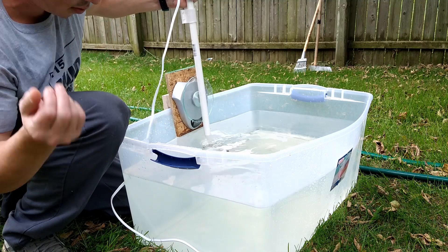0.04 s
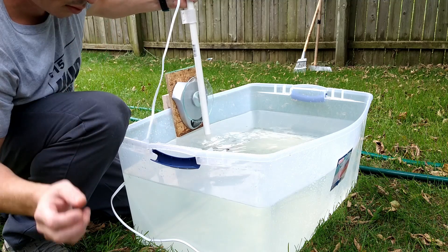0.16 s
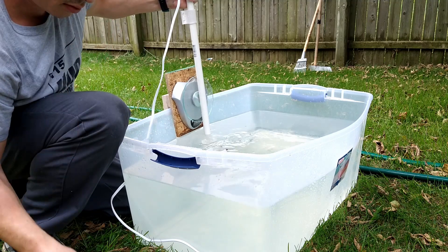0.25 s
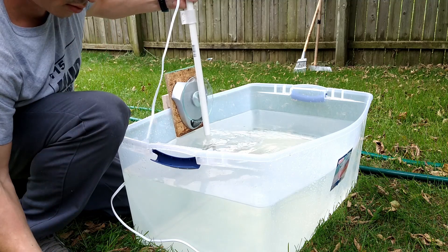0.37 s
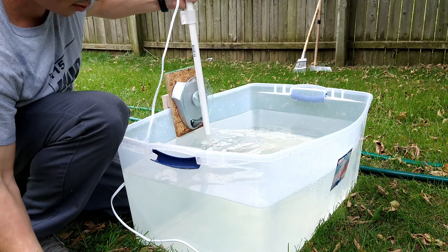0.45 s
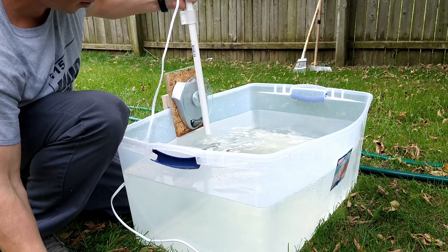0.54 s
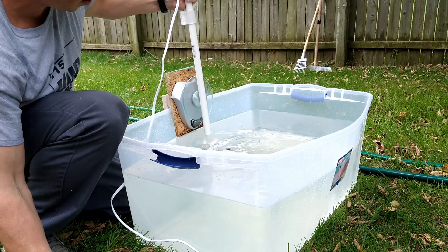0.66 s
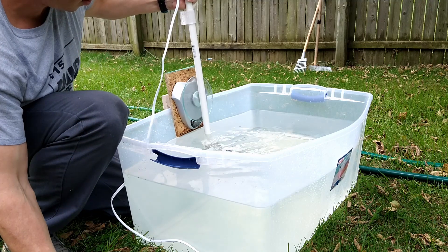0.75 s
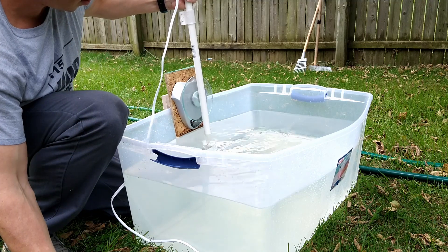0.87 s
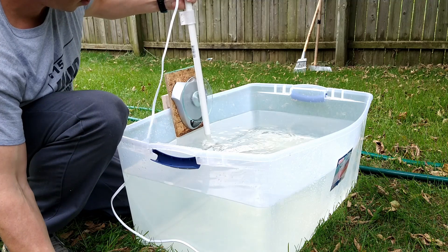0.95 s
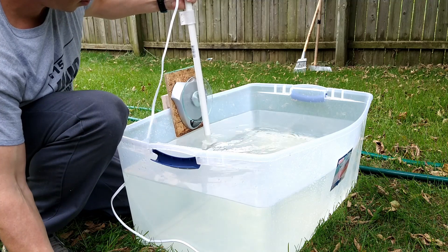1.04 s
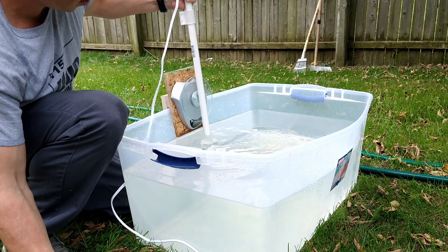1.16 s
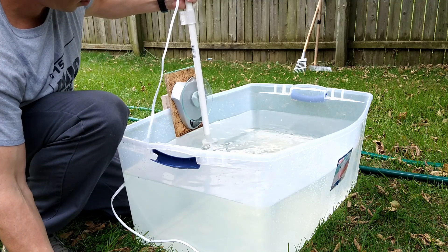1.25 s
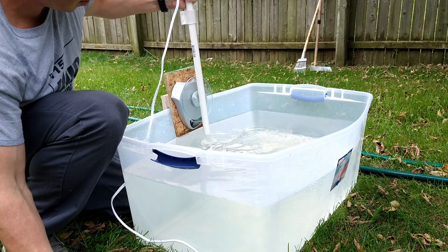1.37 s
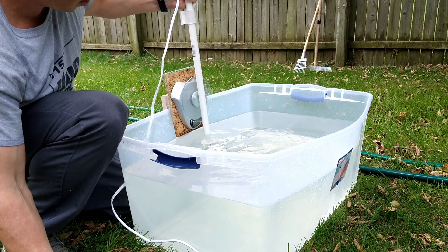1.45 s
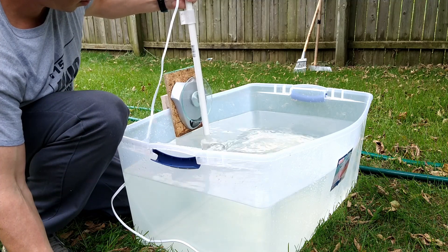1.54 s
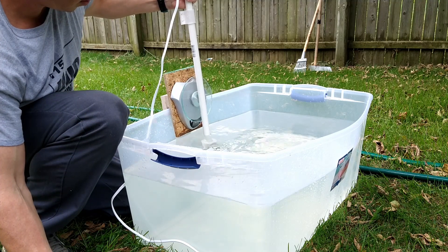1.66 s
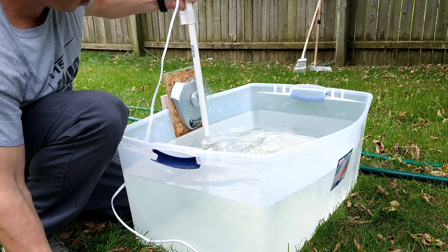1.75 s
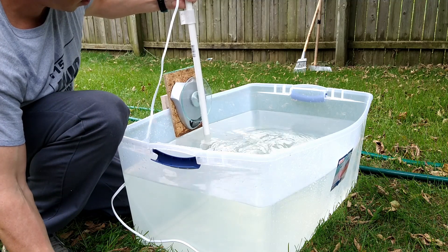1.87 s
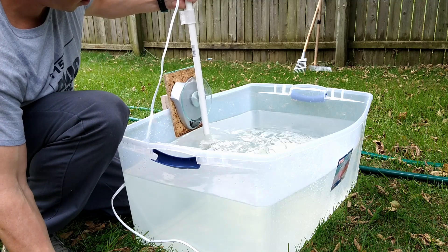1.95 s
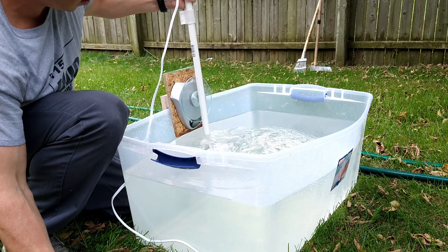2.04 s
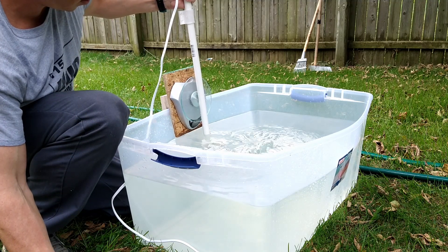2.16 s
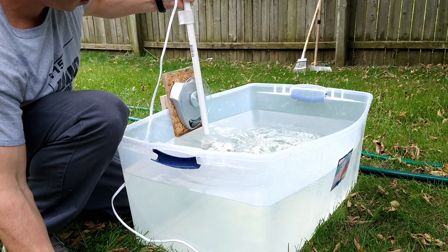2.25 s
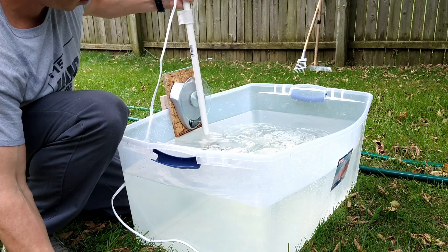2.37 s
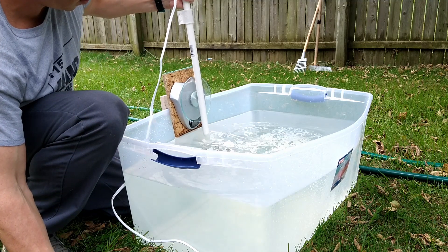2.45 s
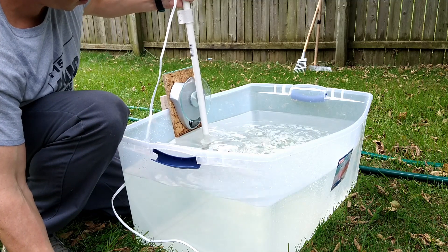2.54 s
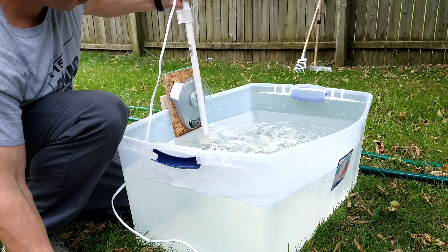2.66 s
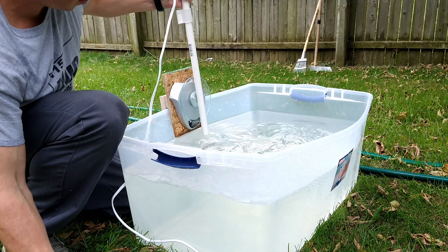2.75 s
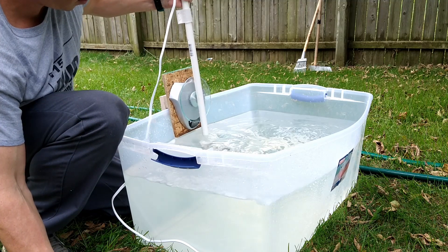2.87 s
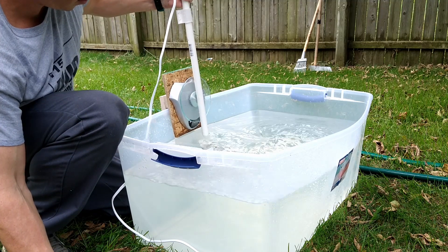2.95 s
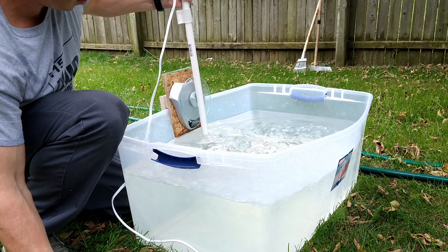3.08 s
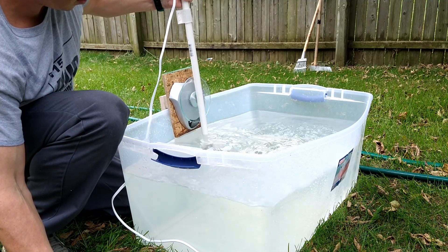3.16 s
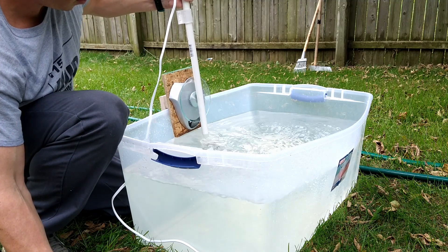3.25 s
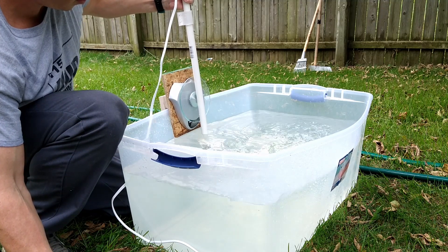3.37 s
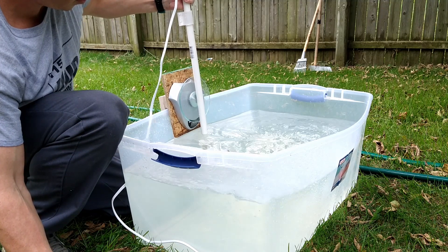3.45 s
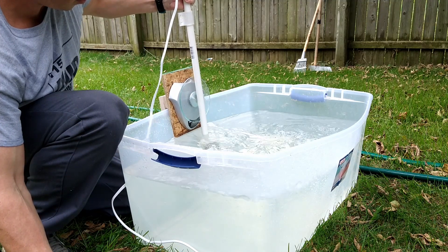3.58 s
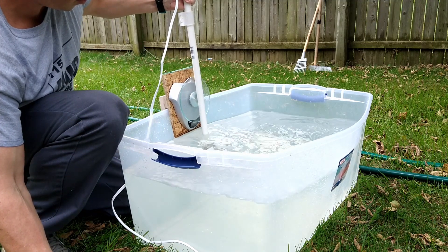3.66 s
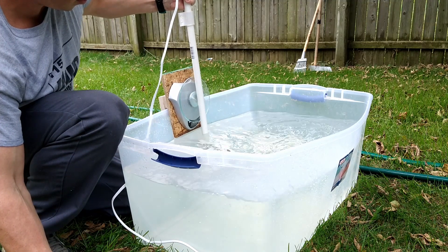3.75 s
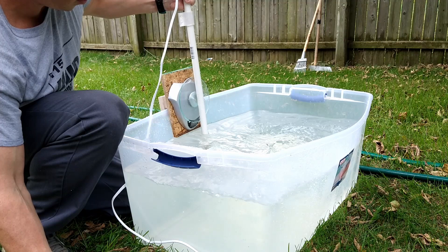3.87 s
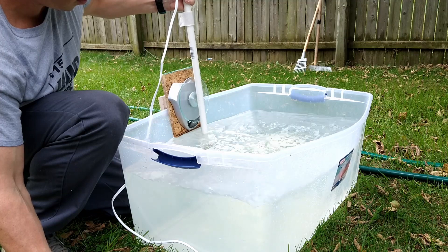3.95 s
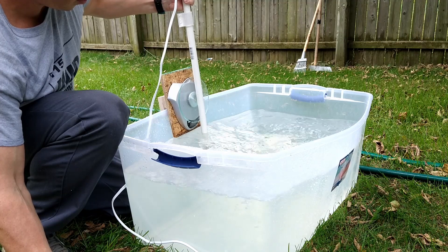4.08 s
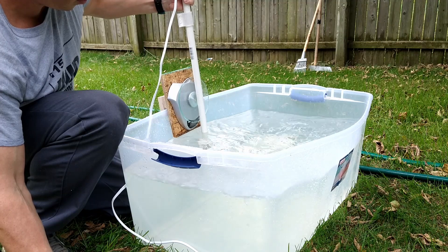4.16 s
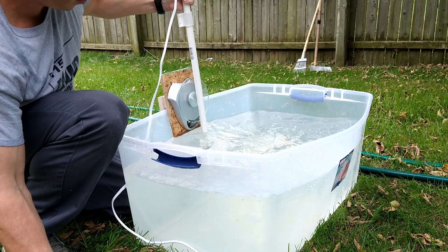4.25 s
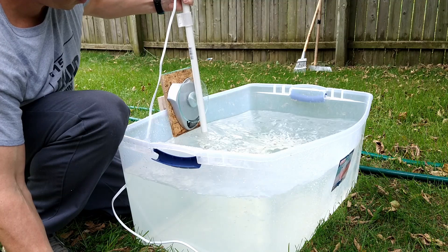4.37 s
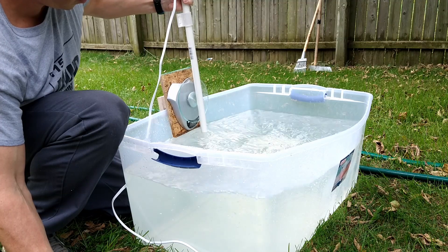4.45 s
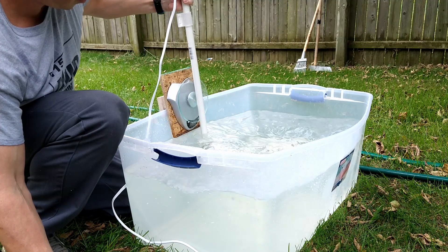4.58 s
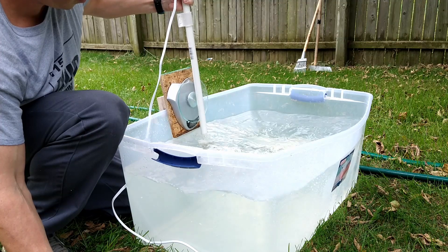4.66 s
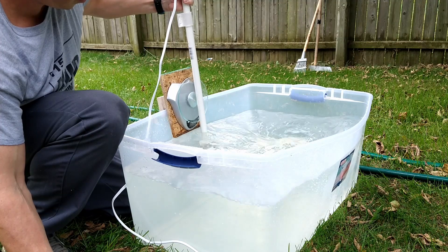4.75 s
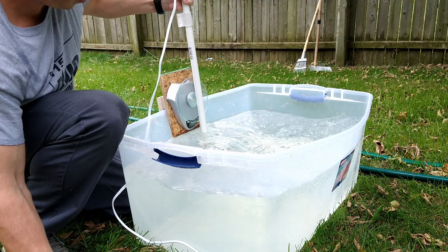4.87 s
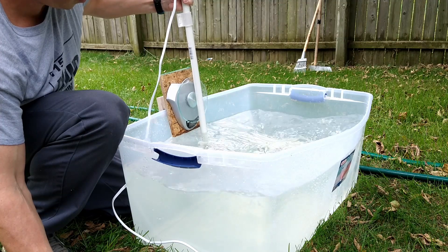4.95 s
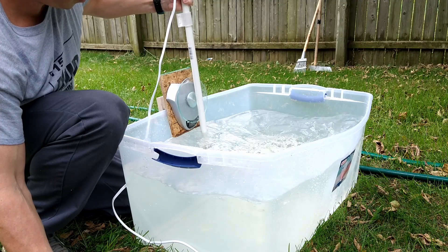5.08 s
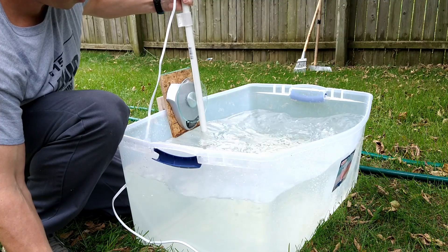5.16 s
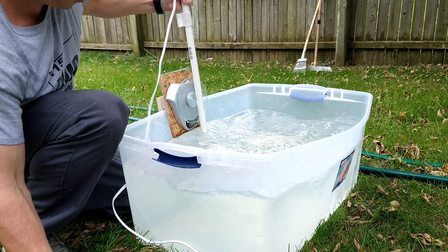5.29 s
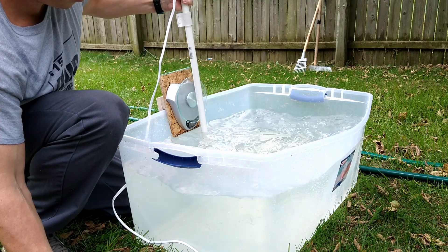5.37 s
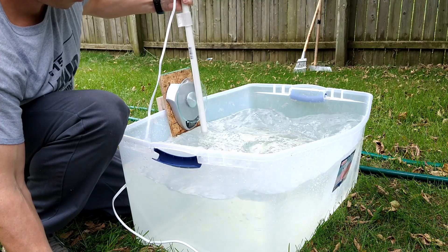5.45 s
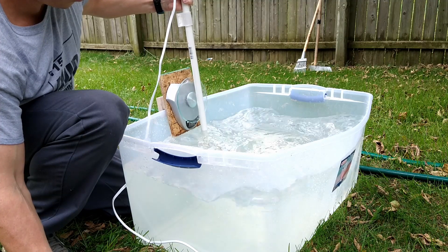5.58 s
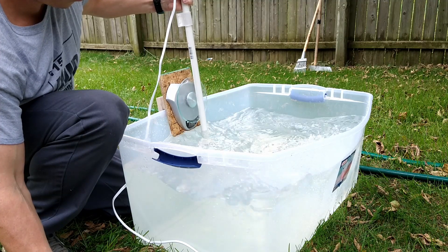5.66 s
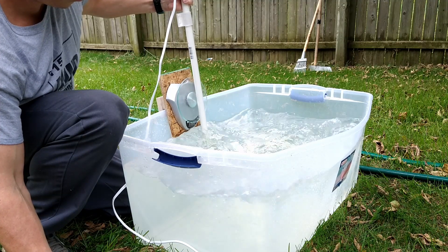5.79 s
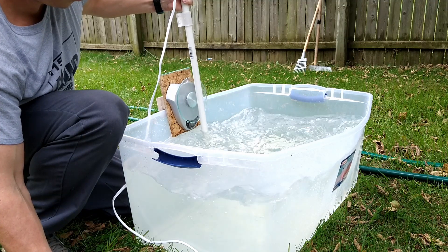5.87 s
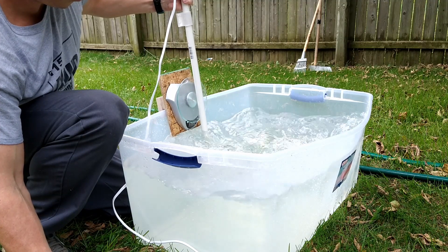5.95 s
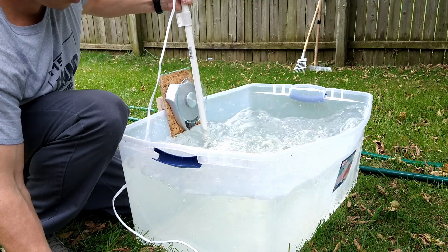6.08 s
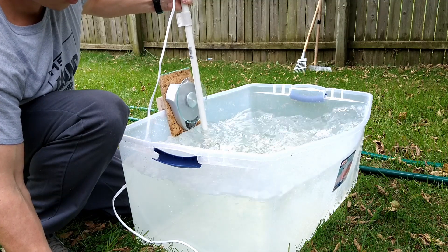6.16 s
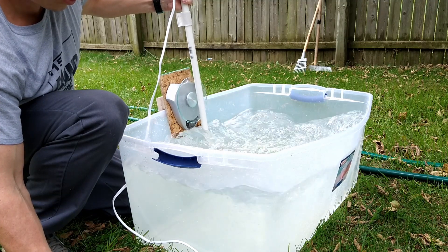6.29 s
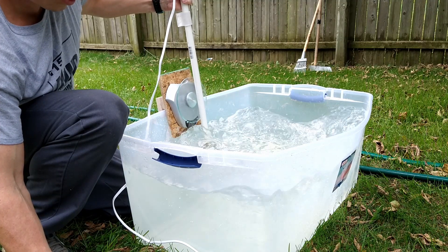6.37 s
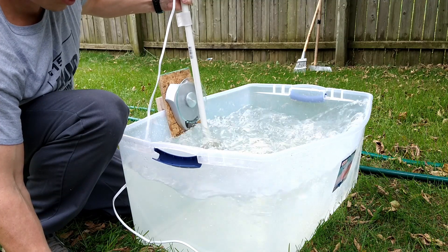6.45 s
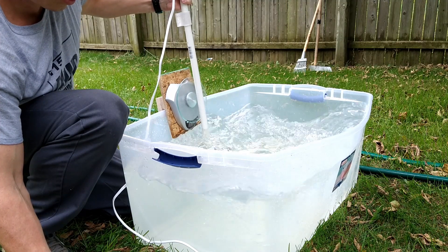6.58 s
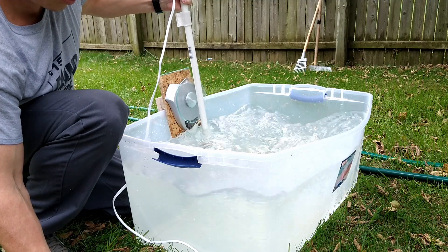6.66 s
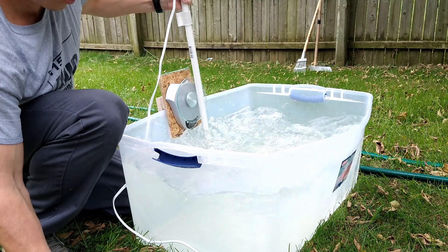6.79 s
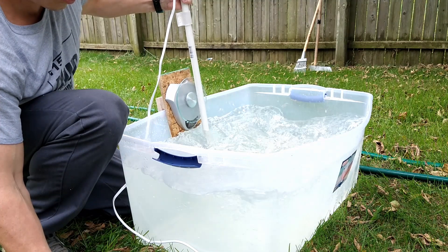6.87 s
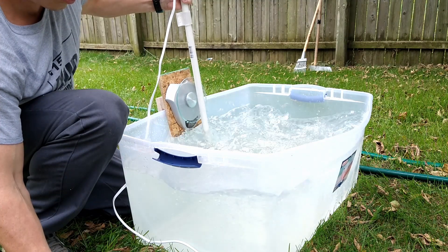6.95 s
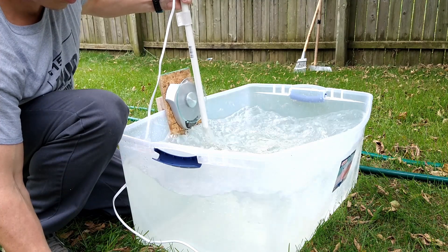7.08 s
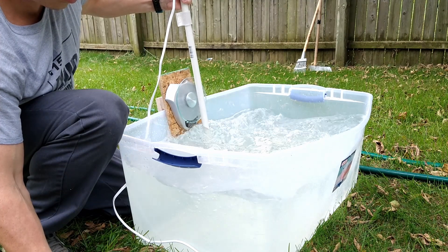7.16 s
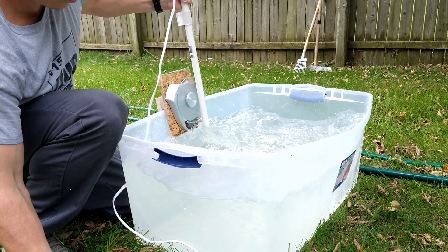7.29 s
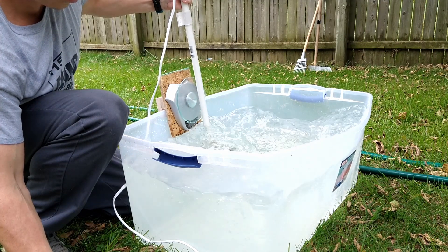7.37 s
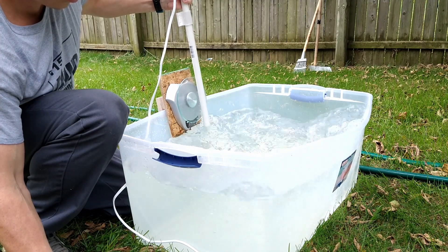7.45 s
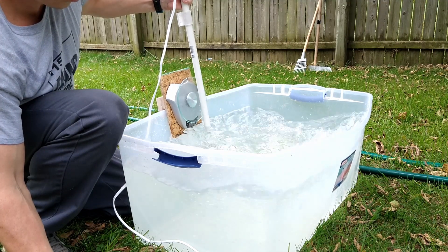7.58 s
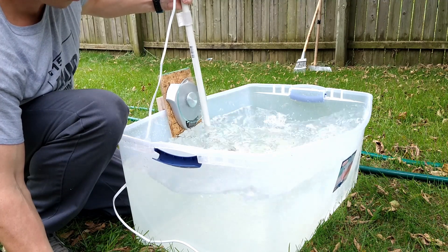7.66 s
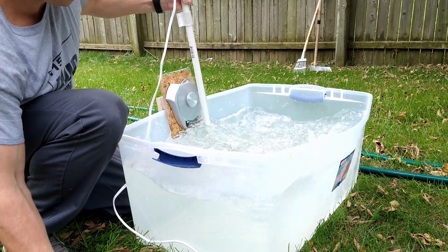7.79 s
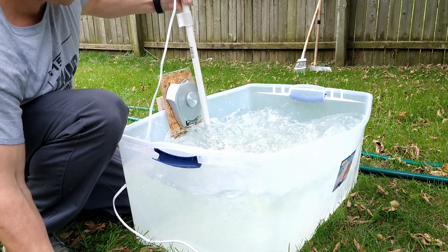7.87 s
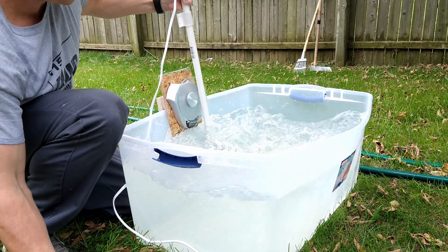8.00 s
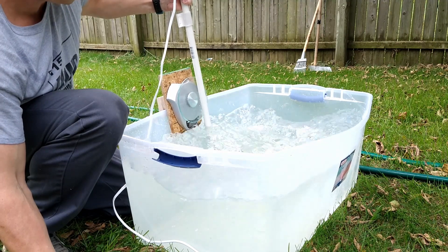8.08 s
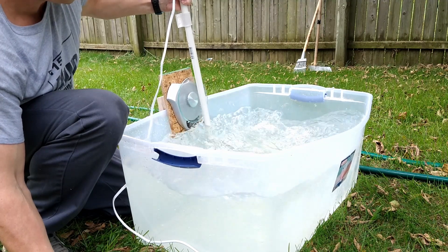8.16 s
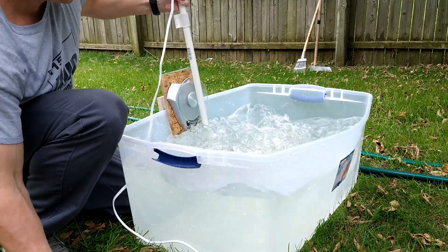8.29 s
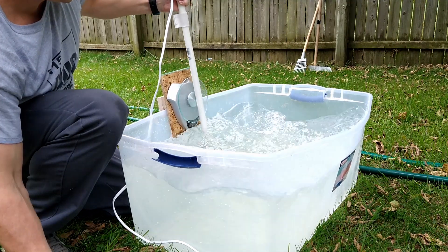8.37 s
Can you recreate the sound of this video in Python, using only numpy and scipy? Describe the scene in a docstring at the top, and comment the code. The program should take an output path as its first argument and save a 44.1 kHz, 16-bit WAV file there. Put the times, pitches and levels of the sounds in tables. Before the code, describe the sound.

Close outdoor take of a geared motor whirring from near silence to a shrill whine while water splashes, gurgles and plops in a plastic tub.

```python
"""A small electric motor on a pipe speeds up and slows again, driving a propeller in a tub of water on a lawn.
The whine is a gliding gear tone with faint shaft tones; the whir is noise hissing and ringing in the housing.
The water is frothy noise, blurred blade tones, many small bubbles and single plops; drops snap as noise cracks.
Behind it are a low noise rumble, partly from the tub and propeller, a low hum, faint hiss and thin high tones.
Two close microphone ports hear the motor and tub from one side."""
import sys
import numpy as np
from scipy import signal
from scipy.fft import rfft, irfft, next_fast_len
from scipy.io import wavfile
from scipy.ndimage import uniform_filter1d, map_coordinates

SR = 44100
rng = np.random.default_rng(int(sys.argv[2]) if len(sys.argv) > 2 else 0)


def to_wav(sig):
    """Store sig (one row per channel, or 1-D mono) as 16-bit WAV at the path in sys.argv[1].

    Samples outside -1..1 are clipped; the rate is SR.
    """
    pcm = np.clip(np.atleast_2d(sig), -1, 1) * 32767
    pcm = np.round(pcm).astype(np.int16)
    wavfile.write(sys.argv[1], SR, pcm.T)  # frames by channels


N = 371674  # length of the scene in samples


def amp(db):
    """Turn decibels into a plain gain."""
    return 10 ** (np.asarray(db) / 20)


def unit(x):
    """Scale a sound to an overall rms of 1."""
    return x / np.sqrt(np.mean(x ** 2) + 1e-20)


def along(points, hz):
    """Read a curve of (Hz, value) points on a log frequency axis."""
    f, value = np.transpose(points)
    return np.interp(np.log(hz + 1), np.log(f + 1), value)


def curves(rows):
    """One value per sample for each column after the time."""
    s, *columns = np.transpose(rows)
    t = np.arange(N) / SR
    return [np.interp(t, s, column) for column in columns]


def wobble(rate):
    """A smooth random curve with `rate` random knots a second."""
    knots = rng.standard_normal(int(N * rate / SR) + 4)
    return map_coordinates(knots, [np.arange(N) * rate / SR])


def filtered(x, response):
    """Filter x by multiplying its spectrum with a response of frequency."""
    m = next_fast_len(N + SR // 2)  # spare room for the filter to ring out
    spectrum = rfft(x, m) * response(np.fft.rfftfreq(m, 1 / SR))
    return irfft(spectrum, m)[..., :N]


def resonances(modes):
    """Sum resonances, each a (Hz, width Hz, dB) row, with alternating signs into one response."""
    def mode(f, center, width, db):
        return amp(db) * 1j * f * width / (center * center - f * f + 1j * f * width)

    return lambda f: sum((-1) ** k * mode(f, *row) for k, row in enumerate(modes))


def rush(gain, alike, patchy_db):
    """Stereo noise of rms 1 with random louder and softer patches in time and pitch."""
    z = signal.stft(rng.standard_normal((2, N)), nperseg=512)[2]
    field = rng.standard_normal(z.shape[1:])
    field = uniform_filter1d(field, size=6, axis=0)  # smooth over pitch
    field = uniform_filter1d(field, size=10, axis=1)  # smooth over time
    pair = signal.istft(z * amp(patchy_db * unit(field)), nperseg=512)[1][:, :N]

    def mid_side(hz):
        # this angle sets how alike the two channels are
        turn = np.arccos(np.clip(along(alike, hz), -1, 1)) / 2
        return gain(hz) * np.array([np.cos(turn), np.sin(turn)])

    mid, side = filtered(pair, mid_side)
    return unit(np.array([mid + side, mid - side]))


# How far the left port leads the right. Each row: frequency in Hz, phase lead in radians.
LEFT_LEAD = [(0, 0), (950, 0), (1460, .8), (2760, 1.4), (3270, 2.1), (5080, 2.7), (5860, 2.5), (8790, 3.7),
             (9730, 5.4), (10900, 6.1), (11400, 10.7), (12000, 10.7), (14200, 12.6), (16600, 13.1)]
# Loudness across the ports. Each row: frequency in Hz, left minus right in dB.
LEFT_BALANCE = [(60, -2), (110, 13), (200, -1), (380, 1), (700, 1), (1290, 0), (2380, 0.5), (4400, 5.5),
                (8120, 3.5), (15000, 2)]


def ports(pair):
    """Sound reaches the left port first and, at most pitches, louder; each port takes half the difference."""
    side = np.array([[.5], [-.5]])
    f, lead = np.transpose(LEFT_LEAD)

    def response(hz):
        return amp(side * along(LEFT_BALANCE, hz)) * np.exp(1j * side * np.interp(hz, f, lead))

    return filtered(pair, response)


# How fast gear teeth meet, idling low until the control is turned up in steps.
# Each row: time in seconds, gear mesh frequency in Hz.
GEAR_SPEED = [(0, 700), (.9, 775), (1.3, 1082), (1.8, 1545), (1.95, 1597), (2.2, 1602), (2.8, 1844),
              (3.43, 2106), (3.7, 2125), (4.04, 2375), (4.33, 2405), (4.66, 2566), (5.38, 2995),
              (5.65, 3104), (5.88, 3177), (6.15, 3178), (6.35, 3189), (6.5, 3183), (6.66, 3187),
              (6.82, 3178), (7.14, 3194), (7.3, 3136), (7.54, 3032), (7.78, 2830), (7.99, 2564),
              (8.2, 2325), (8.43, 2308)]
INERTIA_S = .08  # the rotor rounds off every change of speed over this many seconds


def mesh_hz():
    """Gear mesh frequency at every sample, smoothed by the rotor's inertia."""
    return uniform_filter1d(curves(GEAR_SPEED)[0], size=round(INERTIA_S * SR), mode="nearest")


def by_speed(rows):
    """One value per sample for each column after the mesh frequency."""
    f, *columns = np.transpose(rows)
    hz = mesh_hz()
    return [np.interp(hz, f, column) for column in columns]


# How loud the gear tone arrives at each pitch, before flutter and echoes.
# Each row: mesh frequency in Hz, left level in dB, right level in dB.
WHINE_LEVELS = [(905, -94, -92), (1120, -72, -73), (1300, -77, -78), (1500, -66, -64), (1670, -58, -62),
                (1780, -65, -67), (1950, -57, -61), (2130, -45, -69), (2170, -44.5, -50), (2240, -46, -46),
                (2330, -37, -44), (2388, -39, -41.5), (2462, -37.5, -37.5), (2520, -38, -40.5),
                (2609, -32.5, -41), (2680, -32, -31.5), (2790, -25, -25.5), (2920, -22.5, -24),
                (3095, -24, -21.5), (3103, -32, -26.5), (3155, -19.5, -26.5), (3155, -26, -27.5),
                (3176, -36, -33.5), (3184.6, -25.5, -29), (3205, -20.5, -22)]
# Thin tones tied to the shafts. Each row: multiple of the mesh frequency, level in dB before the load gain.
SHAFT_ORDERS = [(.9, -54), (1.1, -50), (1.385, -52), (1.735, -56), (2.075, -48), (2.42, -56)]
ECHO_DB, ECHO_T60_S = -12, .35  # fence and house walls: gain in dB, seconds to fade by 60 dB


def whine():
    """The gear teeth make a slightly unsteady tone, with wall echoes and faint shaft tones."""
    hz = mesh_hz()
    lead, = by_speed(LEFT_LEAD)
    phase = 2 * np.pi * np.cumsum(hz + 3 * wobble(40)) / SR
    flutter = amp(1.7 * np.array([wobble(28), wobble(28)]))
    two_sides = np.sin(phase + np.array([lead, -lead]) / 2)
    tone = np.sqrt(2) * two_sides * amp(by_speed(WHINE_LEVELS)) * flutter

    t = np.arange(SR // 4) / SR
    tail = rng.standard_normal((2, len(t))) * amp(-60 * t / ECHO_T60_S)
    tail = tail / np.linalg.norm(tail[0])
    echoes = signal.fftconvolve(tone, tail, axes=1)[:, :N]
    tone = tone + amp(ECHO_DB) * echoes  # they beat with the tone while it glides

    orders = 0
    for multiple, db in SHAFT_ORDERS:
        orders = orders + amp(db + 3 * wobble(6.5)) * np.sin(multiple * phase + .6 * wobble(30))
    load = amp(3) * (hz / 3180) ** 8  # shaft tones grow steeply with speed
    return tone + ports(np.array([orders, orders]) * load)


# Color of the brush and bearing hiss. Each row: frequency in Hz, relative level in dB per Hz.
HISS_COLOR = [(530, -28.5), (900, -17.5), (2430, -8.5), (2770, -12), (3010, -6), (3120, -18), (3240, -10.5),
              (3360, -5), (3780, -9), (6640, -1.5), (7390, -7), (9730, -12.5), (15700, -17.5)]
# Housing resonances. Each row: frequency in Hz, width in Hz, relative level in dB.
HOUSING_MODES = [(3490, 130, -14), (4844, 420, -2.5), (5700, 480, -5), (6820, 415, 4), (10130, 2200, -10),
                 (12900, 2500, -12.5), (15500, 910, -14)]
# Mounting resonances. Each row: frequency in Hz, width in Hz, relative level in dB.
MOUNT_MODES = [(1100, 43, -9.5), (2855, 284, 0)]
# How alike left and right are. Each row: frequency in Hz, likeness from -1 to 1.
LIKENESS = [(300, 0.65), (1000, 0.52), (1600, 0.62), (3000, 0.25), (6800, 0.7), (10000, 0.4), (15000, 0.66)]
# Whir at each speed. Each row: mesh frequency in Hz, level shared by hiss and ring in dB,
# housing ring over hiss in dB.
WHIR_LEVELS = [(700, -75.5, 2), (810, -71.5, 0), (1015, -63, -1), (1150, -58, 3), (1365, -55, 0.5),
               (1610, -45.5, 9), (1844, -41.5, 9), (2070, -39, 3), (2444, -35.5, 0.5), (2820, -33.5, -4),
               (3166, -31.5, -7.5)]
LOAD_DB = 1.5  # lower hiss and mounting over the upper hiss


def whir():
    """Brushes and bearings make noise that hisses and rings in the housing and mounting."""
    level_db, ring_db = by_speed(WHIR_LEVELS)
    hiss = rush(lambda hz: amp(along(HISS_COLOR, hz)), LIKENESS, patchy_db=1.6)
    low_hiss = filtered(hiss, lambda hz: 1 / (1 + (hz / 3600) ** 6))
    high_hiss = hiss - low_hiss
    ring = rush(resonances(HOUSING_MODES), LIKENESS, patchy_db=2.0)
    mount = amp(-6.5) * rush(resonances(MOUNT_MODES), LIKENESS, patchy_db=1.5)
    share = 1 / np.sqrt(1 + amp(2 * ring_db))  # hiss and ring split one total power
    gain = amp(level_db + 0.16 * wobble(12)) * share
    return ports(gain * (high_hiss + amp(LOAD_DB) * (low_hiss + mount) + amp(ring_db) * ring))


# Low propeller tones, each loudest at its own speed.
# Each row: multiple of the mesh frequency, relative level in dB, mesh frequency in Hz where it is loudest.
BLADE_ORDERS = [(0.0682, -6, 2750), (0.2074, -5, 2690), (.2768, -5.5, 1790), (.346, -6, 2100)]
# What the tub lets out. Each row: frequency in Hz, gain in dB.
TUB_GAIN = [(100, -25), (210, -6.5), (400, -14.5), (500, -2.5), (570, -6), (650, 4), (730, 3), (830, 0.5),
            (920, -12), (1200, -5)]
BLADE_RANGE_HZ, BLADE_FADE_DB = 447, 7.5  # how far from that speed a tone fades, and by how much at most


def blades():
    """The turning blades make tones blurred by turbulence, heard through the tub walls."""
    mesh = mesh_hz()
    phase = 2 * np.pi * np.cumsum(mesh) / SR

    def blur():
        return wobble(85) * amp(2 * wobble(4))

    hum = 0
    for multiple, db, loudest_hz in BLADE_ORDERS:
        nearness = np.exp(-((mesh - loudest_hz) / BLADE_RANGE_HZ) ** 2)
        gain = amp(db - BLADE_FADE_DB * (1 - nearness))
        hum = hum + gain * (blur() * np.sin(multiple * phase) + blur() * np.cos(multiple * phase))
    return filtered(hum, lambda hz: amp(along(TUB_GAIN, hz)))


def bubbles(s, db, hz, t60, rise):
    """Damped sines with a soft start whose pitch climbs as the bubble nears the surface."""
    t = np.arange(SR // 16) / SR  # each bubble is cut off after 1/16 s
    life = t / t60[:, None]
    turns = hz[:, None] * t * (1 + rise * life)
    fade = amp(db[:, None] - 60 * life)
    soft = 1 - np.exp(-hz[:, None] * t)
    rows = fade * soft * np.sin(2 * np.pi * turns)
    at = np.round(s * SR).astype(int)[:, None] + np.arange(len(t))
    return np.bincount(at.ravel(), rows.ravel(), N + SR)[:N]  # add each bubble at its start


# The wash builds up behind the speed. Each row: time in seconds, churn level in dB, blade hum gain over churn in dB.
CHURN_LEVELS = [(.9, -75, -4), (1.6, -68.5, 9), (2.6, -66, 2.5), (3.1, -54, -1.5), (3.55, -53, -4),
                (4.65, -46.5, 2), (5.4, -44.5, -1), (6.2, -42, -2), (7.3, -40.5, -2), (7.7, -40.5, -7),
                (8.1, -44.5, -5.5), (8.43, -42.5, -6)]
# Color of the froth. Each row: frequency in Hz, relative level in dB per Hz.
FROTH_COLOR = [(88, -45), (150, -14), (205, -16.5), (312, -7), (450, -9), (640, 2), (718, -0.5), (816, 2),
               (985, -9.5), (1130, 2), (1300, -1.5), (1650, 1.5), (2400, -8), (3120, -14), (5280, -120)]
# Waves that break into froth. Each row: time of the peak in seconds, rise in dB, length in seconds.
WAVE_SURGES = [(3.202, 7.5, 0.015), (3.297, 6, 0.025), (4.413, 3, 0.037), (5.216, 3, .04),
               (5.516, 4.5, .02), (5.622, 6, 0.046), (5.74, 4.5, 0.032), (6.154, 3, 0.047),
               (6.33, 5.5, 0.059), (6.428, 5, .04), (6.542, 3.5, 0.014), (6.654, 3.5, 0.025),
               (6.774, 2.5, .05), (7.054, 2.5, .04), (7.164, 5.5, 0.026), (7.368, 4.5, 0.024),
               (7.491, 5.5, .03), (7.605, 2.5, 0.033), (7.83, 4, .03), (7.946, 4, 0.059)]
# Single big bubbles. Each row: start in seconds, level in dB before the soft start, starting pitch in Hz,
# seconds to fade by 60 dB (held to 0.1 at most when played).
BIG_BUBBLES = [(2.925, -42, 795, 0.055), (3.056, -28.5, 1425, 0.03), (3.194, -32.5, 680, 0.051),
               (4.558, -30, 1850, 0.08), (5.399, -42, 640, 0.063), (5.594, -29, 698, 0.079),
               (5.629, -32, 640, 0.078), (5.66, -39, 320, .09), (6.14, -43, 350, 0.094),
               (6.39, -34, 280, .09), (6.159, -36, 634, 0.045), (6.399, -35, 627, 0.06),
               (6.579, -36.5, 295, 0.11), (6.739, -30, 690, 0.045), (6.849, -31, 620, 0.067),
               (7.051, -25.5, 778, 0.051), (7.069, -38, 320, 0.096), (7.089, -43, 1160, 0.056),
               (7.429, -34, 309, 0.13), (7.482, -29, 599, 0.054), (7.581, -31.5, 426, 0.092),
               (7.799, -35.5, 622, 0.1), (8.269, -32, 760, 0.044)]


def water():
    """The propeller wash: a frothy rush in surges, blade hum, a swarm of small bubbles, and single plops."""
    level_db, hum_db = curves(CHURN_LEVELS)
    t = np.arange(N) / SR
    surge_db = 0.58 * wobble(14)
    for s, db, length in WAVE_SURGES:
        surge_db = surge_db + db * np.exp(-((t - s) / length) ** 2)
    froth = rush(lambda hz: amp(along(FROTH_COLOR, hz)), LIKENESS, patchy_db=1.0)

    count = 2500  # small bubbles at random times
    start = rng.random(count) * N / SR
    hz = np.clip(830 * np.exp(.3 * rng.standard_normal(count)), 430, 4000)
    size_db = np.minimum(-3.5 * np.log(1 - rng.random(count)), 12)  # many soft, few loud
    swarm = unit(bubbles(start, size_db, hz, np.minimum(17.8 / hz, .06), rise=0.29))

    s, db, pitch_hz, t60 = np.transpose(BIG_BUBBLES)
    plops = bubbles(s, db, pitch_hz, np.clip(t60, .01, .1), rise=0.166)
    churn = amp(surge_db) * (amp(-2.5) * froth + amp(-7.5) * swarm)
    wash = churn + amp(hum_db) * blades()
    return ports(amp(level_db) * wash + plops)


# Drops that snap on the tub wall and the water.
# Each row: start in seconds, level in dB before shaping, ring pitch in Hz, extra crack level in dB.
DROP_SNAPS = [(0.7394, -52, 4600, -2), (0.8987, -66, 5640, -2), (2.885, -22, 2800, -7.5),
              (2.902, -33, 6900, -5), (2.989, -26.5, 2740, -4), (3.056, -19.5, 2810, -5),
              (3.1284, -30.5, 2580, 4), (3.176, -23, 2370, -7), (3.1932, -20.5, 2590, -11),
              (3.226, -27, 2500, -0.5), (3.28, -28.5, 2580, -1), (3.3554, -25.5, 2700, -6),
              (6.5416, -16, 3120, -7), (6.767, -18, 3300, 0.5)]


def snaps():
    """Each drop is a short crack of noise with a brief ring."""
    out, t = np.zeros(N + SR), np.arange(SR // 40) / SR
    soft = 1 - np.exp(-t / .0004)
    crack_fade, ring_fade = amp(-60 * t / 0.022), amp(-60 * t / 0.02)
    for s, db, hz, crack_db in DROP_SNAPS:
        crack = amp(crack_db) * crack_fade * rng.standard_normal(len(t))
        ring = .5 * ring_fade * np.sin(2 * np.pi * hz * t)
        out[round(s * SR):][:len(t)] += amp(db) * soft * (crack + ring)
    # thin out the bass below 1100 Hz and soften the treble above 13000 Hz
    wet = filtered(out[:N], lambda hz: 1j * hz / (1100 + 1j * hz) / (1 + 1j * hz / 13000) ** 2)
    return ports(np.array([wet, wet]))


# Low rumble, partly from the tub and propeller, swelling as the wash builds.
# Each row: time in seconds, drone level in dB, deep rumble level in dB.
RUMBLE_LEVELS = [(0.0, -70, -69), (0.21, -67, -66), (0.44, -67, -71), (2.58, -65, -72.5), (2.79, -64, -68),
                 (3.45, -58.5, -65.5), (4.98, -58, -67), (8.19, -61, -61), (8.43, -62, -62)]
# Color of the low rumble. Each row: frequency in Hz, relative level in dB per Hz.
RUMBLE_COLOR = [(15, -48), (30, -34), (42, -48), (54, -1.5), (80, 2), (100, -3), (120, 2.5), (140, -5),
                (200, -8), (260, -13.5), (340, -36), (570, -120)]
# Color of the leaves and microphone hiss. Each row: frequency in Hz, relative level in dB per Hz.
GARDEN_COLOR = [(120, -38), (200, -32), (277, -3.5), (320, -7), (550, -10.5), (800, -9), (1400, -15),
                (2200, -35), (3500, -18), (5600, -19.5), (7000, -28), (8500, -42), (12000, -50),
                (15100, -42)]
# Thin electronic tones. Each row: frequency in Hz, level in dB around which it wavers.
THIN_TONES = [(15345, -96), (15620, -79)]
RUMBLE_WAVER_DB = .8
HUM_HZ, HUM_DRIFT_HZ, HUM_DB = 121.6, 3, -68.5  # a wavering low hum


def background():
    """A near-mono low rumble, partly from tub and propeller, a low hum, leaf and microphone hiss, thin tones."""
    drone_db, deep_db = curves(RUMBLE_LEVELS)
    # each row in these two: frequency in Hz, likeness of left and right
    near_mono = [(30, .84), (100, .93), (250, .85)]
    wide = [(250, 0.68), (640, .05), (1400, -0.7), (6800, 0.019), (15000, 0.26)]

    rumble = rush(lambda hz: amp(along(RUMBLE_COLOR, hz)), near_mono, patchy_db=0.5)
    drone = filtered(rumble, lambda hz: 1 / (1 + (88 / (hz + 1)) ** 8))
    deep = rumble - drone  # what lies below about 88 Hz
    low_rumble = amp(drone_db + RUMBLE_WAVER_DB * wobble(3)) * unit(drone)
    low_rumble = low_rumble + amp(deep_db + RUMBLE_WAVER_DB * wobble(5)) * unit(deep)

    hum = np.sin(2 * np.pi * np.cumsum(HUM_HZ + HUM_DRIFT_HZ * wobble(3)) / SR)
    hum = amp(HUM_DB + 3.2 * wobble(7.4)) * hum

    air = rush(lambda hz: amp(along(GARDEN_COLOR, hz)), wide, patchy_db=1.2)
    # hiss piled up under the band limit
    top = filtered(rng.standard_normal(N), lambda hz: 1 / (1 + ((hz - 15600) / 200) ** 2))
    t = np.arange(N) / SR
    tones = sum(amp(db + wobble(5)) * np.sin(2 * np.pi * hz * t) for hz, db in THIN_TONES)
    return low_rumble + hum + amp(-67.5) * air + amp(-89) * unit(top) + tones


def scene():
    """Add the motor, the water and the background together."""
    return whine() + whir() + water() + snaps() + background()


TOP_HZ = 15760  # band limit


def record(dry):
    """Keep only what lies below the band limit."""
    return filtered(dry, lambda hz: hz < TOP_HZ)


dry = scene()
out = record(dry)
to_wav(out)
```